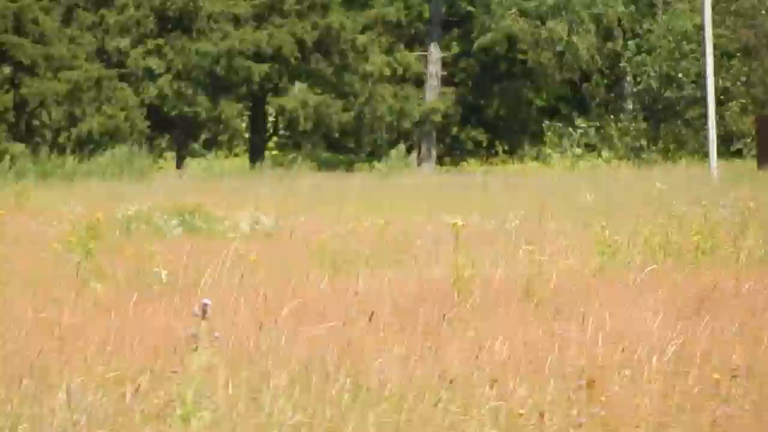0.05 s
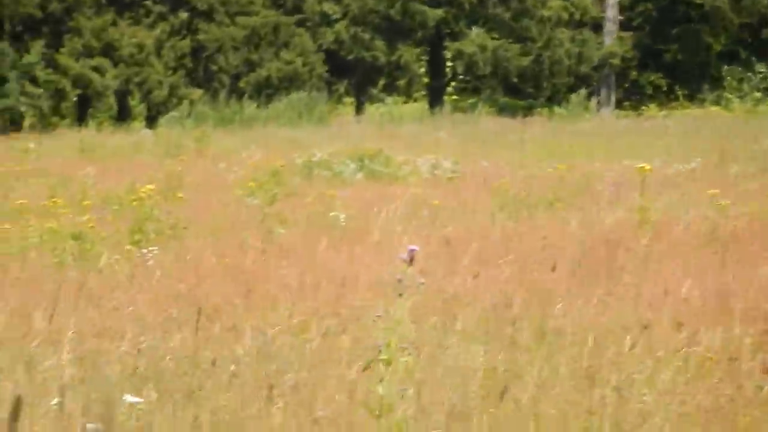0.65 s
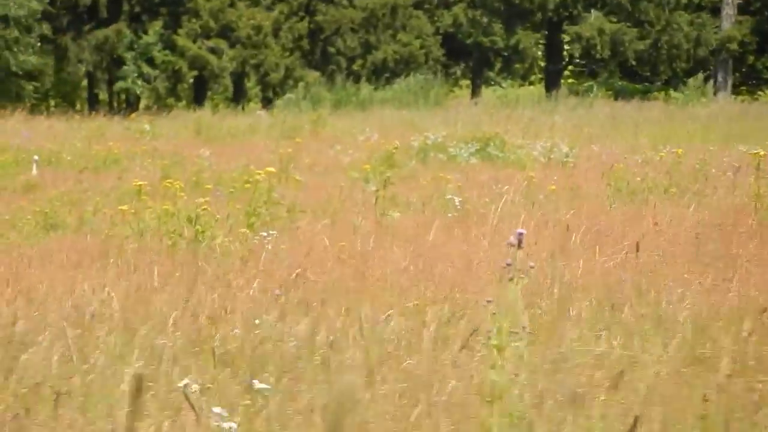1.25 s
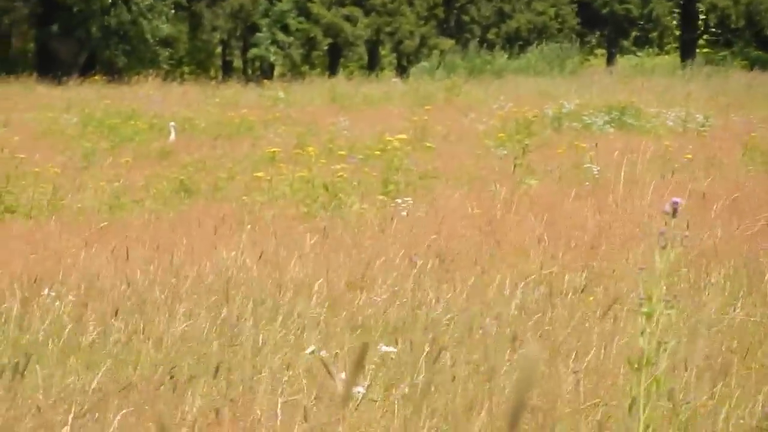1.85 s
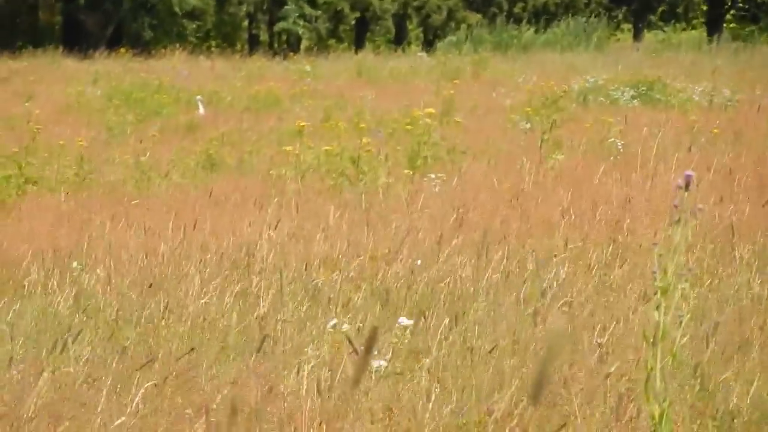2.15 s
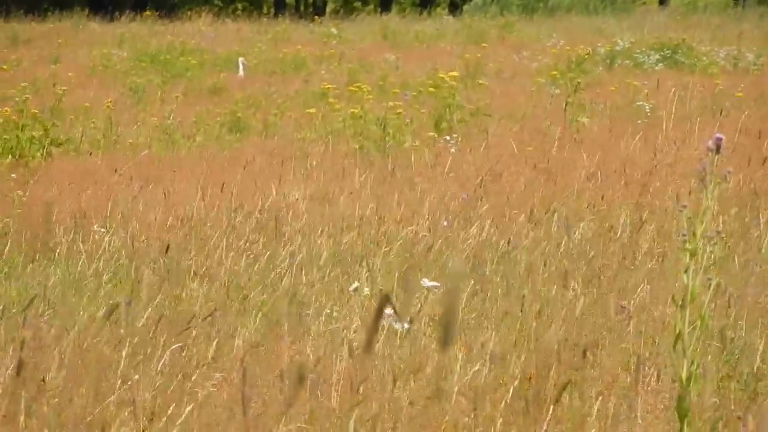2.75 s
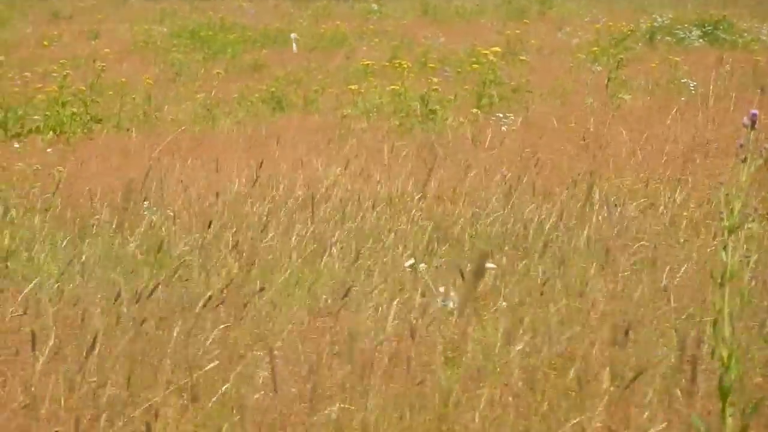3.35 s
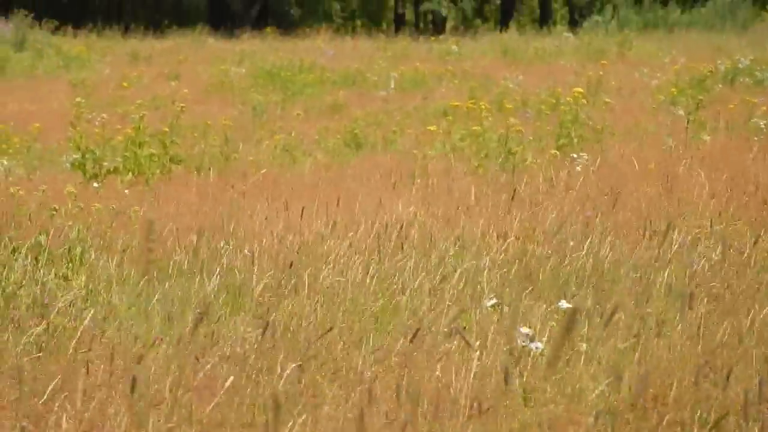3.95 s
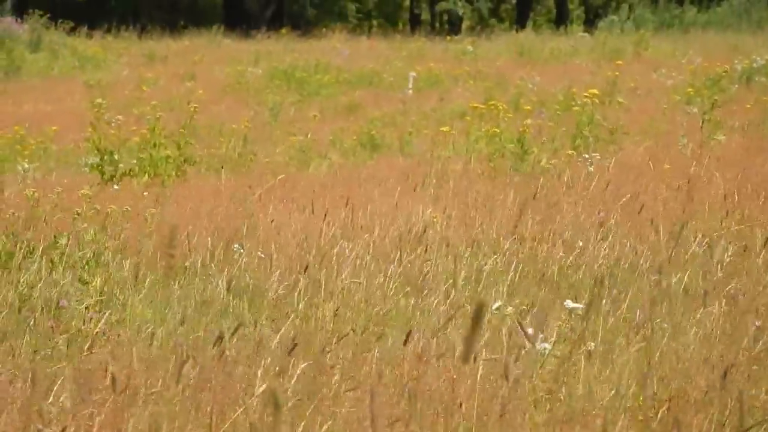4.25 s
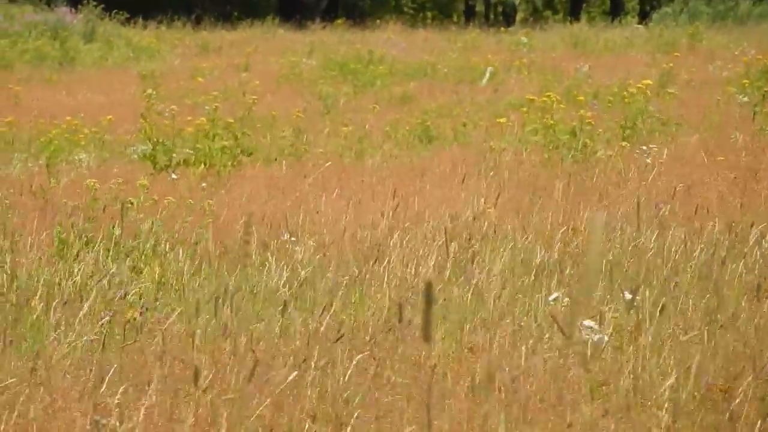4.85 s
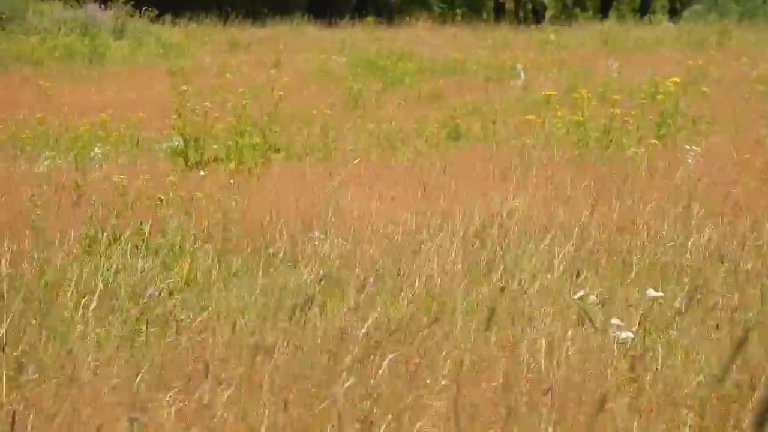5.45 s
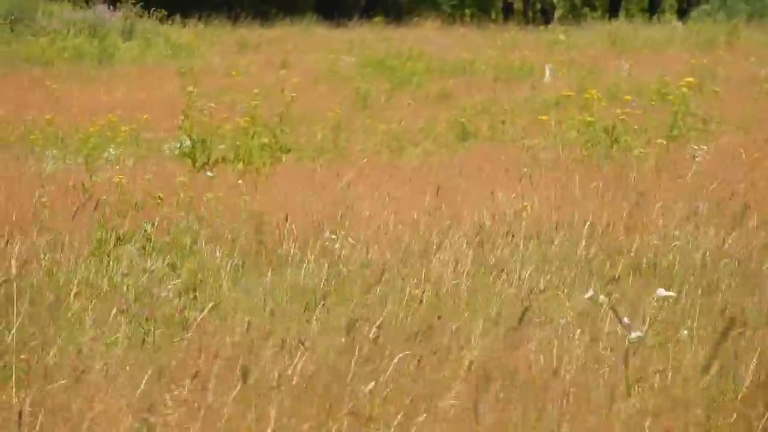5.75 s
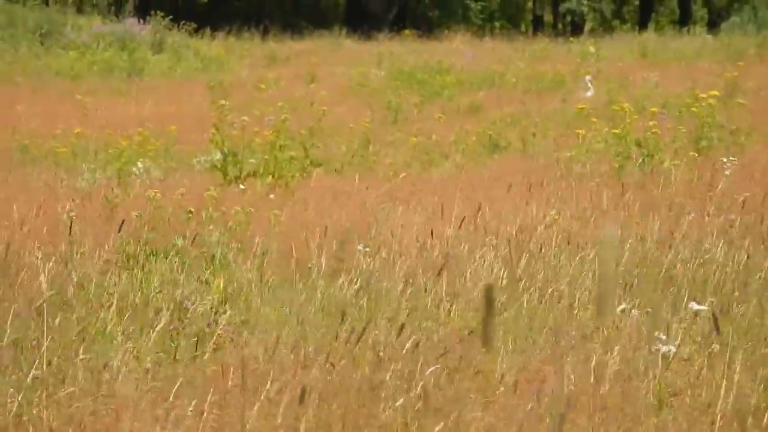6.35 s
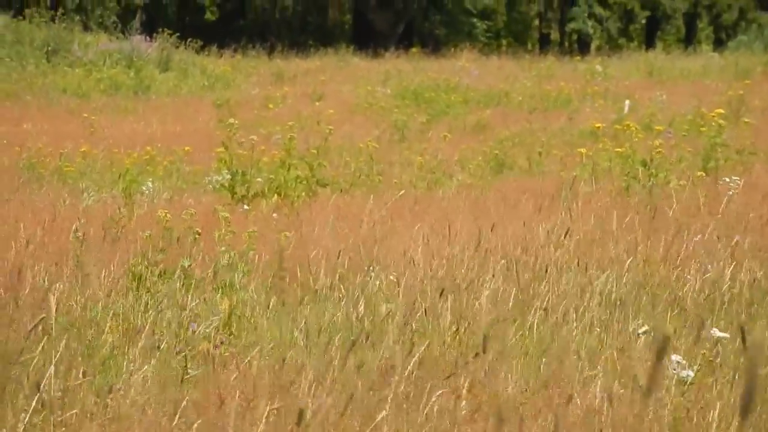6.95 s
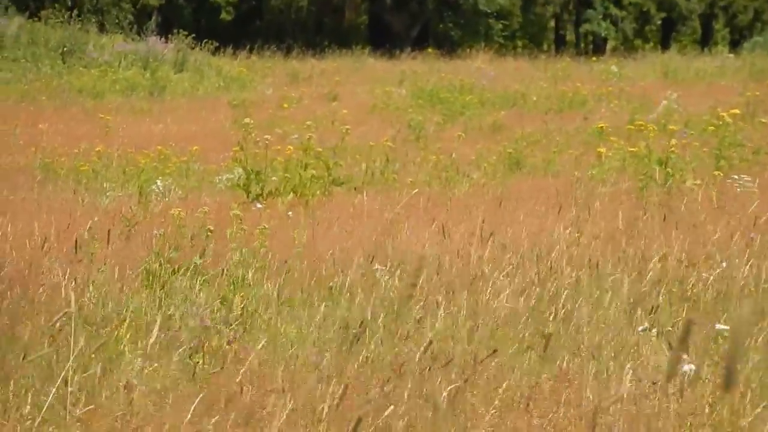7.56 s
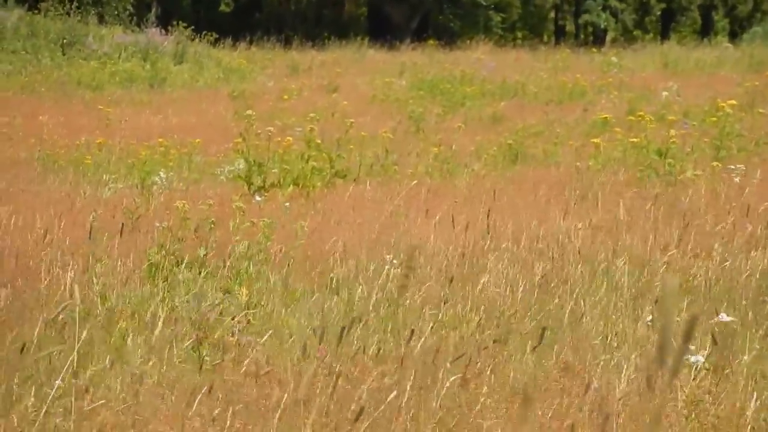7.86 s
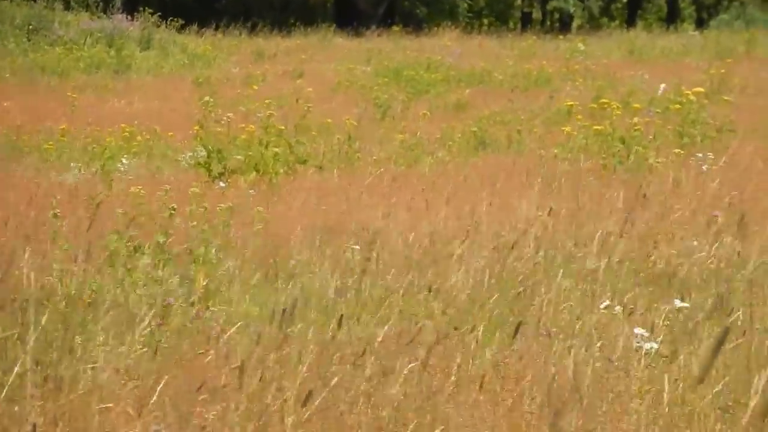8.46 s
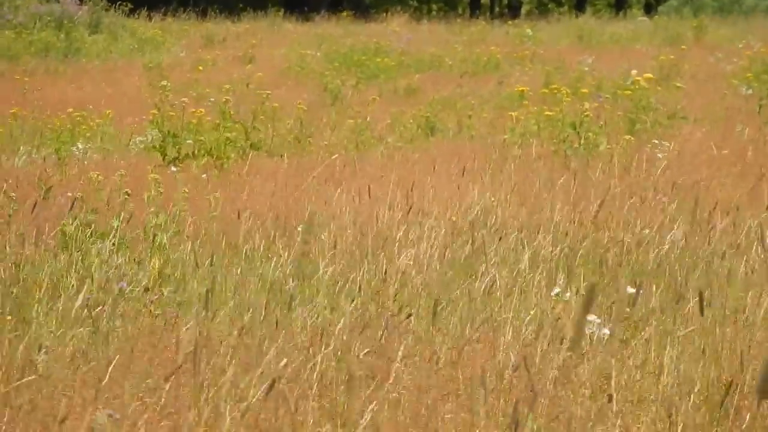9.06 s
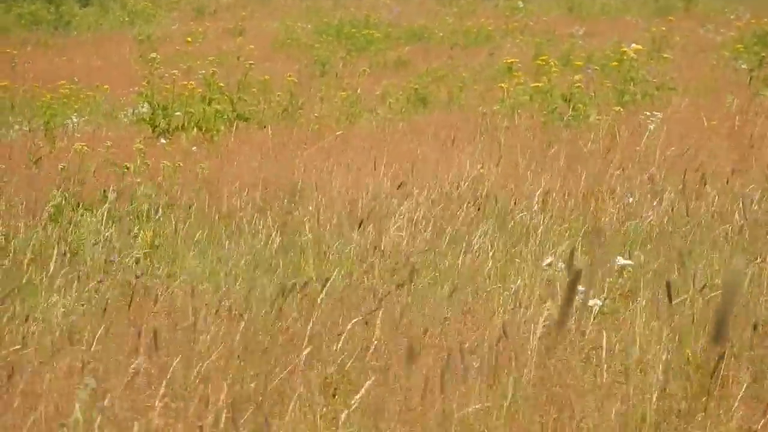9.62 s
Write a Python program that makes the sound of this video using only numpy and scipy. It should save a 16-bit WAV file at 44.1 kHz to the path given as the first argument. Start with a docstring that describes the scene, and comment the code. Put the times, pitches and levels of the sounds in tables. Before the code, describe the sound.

Gusty wind buffets the microphone in a meadow, over steady, high, pulsing insect chirring and a faint, repeated bird chirp.

```python
"""A summer meadow, heard from a hand-held camera. From the start a near bush-cricket scrapes its wings
in about ten short rasps (syllables) a second, while another buzzes over the hiss of far insects.
Soon a bird joins in with a thin falling whistle about once a second, and a third cricket answers
now and then. Gusts build up and hit the two microphone openings (ports); around three to four seconds
in, the hardest blows make a limiter turn everything down briefly. The wind eases; the insects go on."""
import sys
import numpy as np
from scipy import signal
from scipy.fft import rfft, irfft, next_fast_len
from scipy.io import wavfile
from scipy.ndimage import uniform_filter1d, minimum_filter1d, map_coordinates

SR = 44100
rng = np.random.default_rng(int(sys.argv[2]) if len(sys.argv) > 2 else 0)


def dump(signal):
    """Clip the signal to [-1, 1] and save it as 16-bit WAV at the path in sys.argv[1]."""
    limited = np.clip(np.atleast_2d(signal).T, -1, 1)
    pcm = np.round(limited * 32767).astype(np.int16)
    wavfile.write(sys.argv[1], SR, pcm)


N = 427329
TIME = np.arange(N) / SR

# Levels in the tables are relative: the functions add their own gains.
# tone of the far insects: f/Hz, level/dB
CHORUS_SPECTRUM = [(3000, -13), (6800, -17), (8000, -10.5), (9500, -4), (11500, 0.5), (12500, -3.5),
                   (14200, 0.5), (15800, -6.5)]
# tone of the soft background hush: f/Hz, level/dB
HUSH_SPECTRUM = [(21, 24.5), (61, 20), (112, 1), (205, 6.5), (355, 1.5), (610, 7.5), (1020, 2), (1950, -4),
                 (3100, -12), (4600, -5), (6900, -7), (15900, -31)]
# when the bird calls: t/s, level/dB
BIRD_CALLS = [(.599, -50.5), (1.541, -51.5), (2.476, -52.5), (3.595, -47.5), (4.459, -50.5), (5.295, -52),
              (6.276, -41), (7.124, -52.5), (8.01, -51), (8.828, -55)]
# the slide of one call: t/s within the call, f/Hz, level/dB
CALL_SHAPE = [(-.004, 6010, -21), (.005, 5860, -3), (.017, 5620, 4), (.030, 5246, 2.5), (.041, 5250, 4.5),
              (.049, 5100, -15), (.056, 5000, -26)]
# faint, short, high ticks: t/s, level/dB
TICK_TIMES = [(3.378, -41), (4.098, -42), (4.167, -38), (4.978, -42)]
# light breeze between gusts: t/s, level/dB
BREEZE_LEVEL = [(0, -47), (5, -27.5), (9.7, -54.5)]
# gusts over the ports: t/s, length/s, left level/dB, right level/dB, extra turbulence/dB
WIND_GUSTS = [(0.086, 0.17, -54, -40.5, -5), (0.44, 0.22, -50, -32.5, -10), (0.63, 0.026, -47, -22.5, -6),
              (0.797, 0.27, -42, -36, -17), (1.105, .14, -25, -20, 0), (1.293, 0.085, -37, -18.5, -1.5),
              (1.407, 0.22, -36, -20, -6), (1.69, 0.039, -52, -30, 13), (1.877, 0.19, -24, -16, -13),
              (2.065, 0.2, -17.5, -13.5, -2.5), (2.335, 0.16, -21, -14, 0.5),
              (2.56, 0.073, -26, -25.5, -10), (2.695, .11, -11, -11.5, -2), (2.845, .14, -19, -18.5, 0.5),
              (3.042, 0.23, -16, -14, 6), (3.318, 0.12, -15, -15, 1.5), (3.48, 0.11, -14.5, -11.5, -0.5),
              (3.656, 0.043, -19.5, -15.5, -6), (3.785, 0.22, -22, -19.5, 3.5),
              (4.032, 0.13, -14, -10, 1.5), (4.165, 0.14, -12, -10.5, 2), (4.303, .32, -15, -12, -4.5),
              (4.67, 0.075, -14, -12.5, -10.5), (4.798, 0.26, -28, -15, -7), (5.066, 0.21, -21, -19.5, -11),
              (5.44, 0.19, -27.5, -17.5, 1), (5.608, .24, -17.5, -17, 1), (5.89, 0.13, -46, -27.5, -21),
              (6.062, .23, -17.5, -16, -1), (6.35, 0.35, -25, -19.5, -3.5), (6.632, 0.23, -17, -12.5, -0.5),
              (6.857, .20, -18, -18, -4.5), (7.144, .13, -26, -25, -19), (7.556, 0.19, -30.5, -23.5, -2.5),
              (7.848, 0.33, -24, -21, -15), (8.185, 0.25, -36.5, -32, -8), (8.772, 0.28, -44.5, -47, -11),
              (8.905, 0.015, -36, -25, -7), (9.542, 0.14, -35, -24.5, 1)]
# tone of slow eddies (swirls of air): f/Hz, level/dB
RUMBLE_SPECTRUM = [(15, -40), (30, -19), (45, -9), (62, -1), (85, -0.5), (115, -4.5), (160, -16.5),
                   (250, -28.5), (400, -68), (800, -68), (2000, -77)]
# tone of the finer turbulence in strong gusts: f/Hz, level/dB
FLUTTER_SPECTRUM = [(50, -20), (120, 5.5), (220, 2), (320, -4.5), (450, -16.5), (700, -34), (1200, -44.5),
                    (3000, -51), (8000, -98)]
# hard eddies that hit one port: t/s, peak/dB, treble cutoff/Hz, crackle decay/s, port (0 left, 1 right)
HARD_EDDIES = [(1.152, -1.5, 3030, 0.0041, 1), (1.200, -2, 647, 0.0092, 1), (2.121, -11.5, 900, .008, 1),
               (2.159, -9.5, 910, 0.0083, 0), (2.287, -11, 2200, 0.0057, 1), (2.714, -9, 1000, 0.0072, 0),
               (2.753, -3, 3000, 0.0065, 1), (3.085, -7, 1400, 0.0036, 1), (3.100, -7, 1600, .004, 1),
               (3.144, -1.5, 640, 0.005, 1), (3.201, -2, 3000, 0.0022, 1), (3.214, -2.5, 2300, 0.0036, 1),
               (3.268, -2, 1100, 0.0051, 1), (3.365, -10.5, 900, 0.0052, 1), (3.402, 6.5, 3500, 0.004, 1),
               (3.500, -3.5, 603, 0.0046, 1), (3.580, 0, 700, 0.011, 1), (3.792, -3, 560, 0.0093, 1),
               (3.926, -6.5, 530, 0.0028, 0), (4.121, 4.5, 3340, 0.0045, 1), (4.189, 9, 1670, 0.0075, 1),
               (4.235, 3, 614, 0.028, 1), (4.712, -11.5, 2200, .005, 1), (5.001, -1.5, 476, .003, 1),
               (5.013, 3.5, 2580, 0.0033, 1), (5.535, -12, 1310, 0.0054, 1), (5.735, -6, 714, 0.0037, 0),
               (5.856, -9, 676, .008, 1), (6.379, -7, 676, 0.009, 1), (6.665, -7.5, 1100, 0.0062, 0),
               (6.700, -14.5, 2000, 0.012, 1), (6.770, -8.5, 865, .008, 1), (6.830, -7.5, 1300, 0.0049, 1),
               (7.232, -10.5, 2282, 0.004, 1), (7.280, -9, 484, .004, 1)]
# tone of a cricket's wing scrape: f/Hz, level/dB
SCRAPE_SPECTRUM = [(4000, -32), (7200, -26), (8500, -19.5), (9500, -7.5), (10300, -12.5), (11400, -2),
                   (12000, 4), (12600, -5), (13200, -9), (14300, -4), (15800, -15)]
# a syllable, as the wings open once and close in two pulls: offset/s, length/s, level/dB, tooth rate/Hz
WING_STROKES = [(-.0272, .0044, -12, 1200), (-.0091, .0031, -7.5, 900), (-.0019, .0046, -4.5, 880)]
# single syllables from a neighbouring cricket: t/s, level/dB
NEIGHBOUR_SYLLABLES = [(1.670, -33), (6.634, -34), (9.002, -32)]
# the near cricket's runs of even tempo: t/s, syllable rate/Hz
SONG_RUNS = [(.0518, 10.68), (.239, 10.40), (.9118, 10.09), (1.4226, 10.35), (2.7754, 10.57), (3.4378, 9.4),
             (3.757, 10.0), (4.5566, 10.18), (5.3425, 10.41), (6.6871, 10.22), (6.9806, 10.59),
             (7.925, 10.28), (8.7032, 10.47)]
# how hard the near cricket sings: t/s, level/dB
SONG_EFFORT = [(0, -26), (.35, -26), (1.1, -27.5), (1.85, -34), (2.2, -28.5), (2.35, -32), (2.85, -30.5),
               (3.2, -27), (3.6, -30.5), (4.0, -27), (4.9, -28.5), (5.85, -30.5), (6.35, -30.5),
               (6.65, -28), (7.35, -30), (8.6, -28.5), (9.7, -31)]
# where the near cricket is heard as the camera turns: t/s, left minus right level/dB
SONG_PAN = [(0, 4), (1.5, 8.5), (3, 6.5), (5, 5.5), (7, 6), (8.2, 6.5), (9.7, 5)]


def gain_of(db):
    """Turns decibels into a number to multiply a sound by."""
    return 10 ** (np.asarray(db) / 20)


def unit_rms(x):
    """Scales each channel to an average strength (rms) of 1."""
    return x / np.sqrt(np.mean(x ** 2, axis=-1, keepdims=True) + 1e-20)


def curve(rows, column, t=TIME):
    """One column of a table, joined by straight lines in time."""
    rows = np.asarray(rows, float)
    return np.interp(t, rows[:, 0], rows[:, column])


def noise(spectrum, shape=(2, N)):
    """Noise of rms 1 with the tone of a spectrum table, separate for each channel."""
    size = next_fast_len(N + 4096)
    hz, db = np.transpose(spectrum)
    tone_db = np.interp(np.log(np.fft.rfftfreq(size, 1 / SR) + 1), np.log(hz), db)
    white = rfft(rng.standard_normal(shape), size)
    return unit_rms(irfft(white * gain_of(tone_db), size)[..., :N])


def wander(per_s):
    """A smooth curve of rms 1 through per_s random points a second."""
    points = rng.standard_normal(8192)
    smooth = map_coordinates(points, [TIME[::32] * per_s], mode="wrap")
    return unit_rms(np.interp(TIME, TIME[::32], smooth))


def add(mix, s, sound):
    """Mixes a sound in at s seconds."""
    part = mix[max(round(s * SR), 0):][:len(sound)]
    part += sound[:len(part)]


def place(x, pan_db, lag_s=.000027):
    """Makes stereo: the left is pan_db louder, and the right comes a little later."""
    size = next_fast_len(N + 64)
    delay = np.exp(-2j * np.pi * np.fft.rfftfreq(size, 1 / SR) * lag_s)
    late = irfft(rfft(x, size) * delay, size)[:N]
    return np.array([x * gain_of(pan_db / 2), late * gain_of(-pan_db / 2)])


def echo(x, fade_s):
    """Many tiny reflections blur into a tail that drops 60 dB in fade_s."""
    t = TIME[:SR // 2]
    tail = unit_rms(rng.standard_normal((2, len(t))) * gain_of(-60 * t / fade_s)) / np.sqrt(len(t))
    return signal.oaconvolve(x, tail, axes=1)[:, :N]


def meadow(chorus_db=-48.5, hush_db=-53.5, flicker_db=2.0):
    """Countless far insects merge into hiss over a soft hush whose pitch bands flicker at random."""
    chorus = noise(CHORUS_SPECTRUM) * gain_of(chorus_db + 1.7 * wander(13))
    bands = signal.stft(noise(HUSH_SPECTRUM), nperseg=1024)[2]
    flicker = rng.standard_normal(bands.shape[1:])
    flicker = uniform_filter1d(uniform_filter1d(flicker, size=4, axis=0), size=7, axis=1)
    hush = signal.istft(bands * gain_of(flicker_db * flicker / flicker.std()))[1][:, :N]
    return chorus + unit_rms(hush) * gain_of(hush_db + 1.1 * wander(1.83))


def buzzing_cricket(level_db=-52.0, beat_hz=103.5, ring_hz=13200, fall_hz=5000, width_hz=3000):
    """A farther cricket beats its wings about 100 times a second; their ring falls in each stroke."""
    phase = np.cumsum(beat_hz * (1 + 0.0031 * wander(3.9))) / SR % 1 - .5
    strokes = rng.standard_normal(N) * np.exp(-(phase / .14) ** 2 / 2)
    # keep only a band of the noise, centred on the falling pitch
    sweep = np.exp(2j * np.pi * np.cumsum(ring_hz - fall_hz * phase) / SR)
    ring = (sweep * signal.lfilter(*signal.butter(2, width_hz / 2, fs=SR), strokes / sweep)).real
    return place(gain_of(level_db + 0.51 * wander(23)) * unit_rms(ring), pan_db=6.5)


def bird(gain_db=-8, echo_db=-9, flicker_db=2.0):
    """A nearly pure falling whistle, each at its own pace, echoed faintly by the forest edge."""
    out = np.zeros(N)
    bend, flicker = 1 + .008 * wander(110), flicker_db * wander(130)
    paces = np.exp(.07 * np.clip(rng.standard_normal(len(BIRD_CALLS)), -1.5, 1.5))
    for (s, db), pace in zip(BIRD_CALLS, paces):
        t = np.arange(CALL_SHAPE[0][0] / pace, CALL_SHAPE[-1][0] / pace, 1 / SR)
        hz = curve(CALL_SHAPE, 1, t * pace) * np.interp(s + t, TIME, bend)
        loudness = gain_of(db + curve(CALL_SHAPE, 2, t * pace) + np.interp(s + t, TIME, flicker))
        add(out, s + t[0], loudness * np.sin(2 * np.pi * np.cumsum(hz) / SR))
    direct = place(out, pan_db=13)
    return gain_of(gain_db) * (direct + gain_of(echo_db) * echo(direct, fade_s=0.15))


def ticks(band_hz=(3800, 6200), decay_s=0.0038):
    """Faint, short, high ticks during the strongest gusts."""
    out, t = np.zeros(N), TIME[:1024]
    for s, db in TICK_TIMES:
        add(out, s, gain_of(db) * np.exp(-t / decay_s) * rng.standard_normal(len(t)))
    band = signal.butter(2, band_hz, "band", fs=SR, output="sos")
    return place(signal.sosfilt(band, out), pan_db=-3)


def wind_strength(rise_s=0.02, decay_s=0.044):
    """Gusts rise, hold and fade over the breeze; gives pressure and extra turbulence per port in dB."""
    t = TIME[::64]
    power = gain_of(curve(BREEZE_LEVEL, 1, t)) ** 2 * np.ones((2, 1))
    churn = np.zeros_like(power)
    for start, length, left_db, right_db, turbulence_db in WIND_GUSTS:
        age = np.maximum(t - start, 0)
        shape = np.minimum(age / rise_s, 1) * np.exp(-np.maximum(age - length, 0) / decay_s)
        gust = (shape * gain_of([[left_db], [right_db]])) ** 2
        power += gust
        churn += turbulence_db * gust
    return [np.array([np.interp(TIME, t, port) for port in both_ports])
            for both_ports in (10 * np.log10(power), churn / power)]


def wind(pressure_db, turbulence_db, rumble_db=-1, flutter_db=-13, strong_db=-20, swirl_db=3.5):
    """Eddies rumble over each port; finer turbulence flutters in lumps and grows faster with the wind."""
    pressure_db = pressure_db + swirl_db * np.clip([wander(22), wander(22)], -2, .7)
    eddies = noise(RUMBLE_SPECTRUM)
    eddy_power = abs(uniform_filter1d(eddies ** 2, size=2400))
    steadied = unit_rms(eddies / eddy_power ** 0.39)  # irons out most chance swells
    rumble = steadied * gain_of(pressure_db + rumble_db)
    lumps = gain_of(8 * np.clip([wander(45), wander(45)], -2, 1.4))
    grown_db = strong_db + 1.55 * (pressure_db - strong_db)
    flutter = unit_rms(noise(FLUTTER_SPECTRUM) * lumps) * gain_of(flutter_db + turbulence_db + grown_db)
    return rumble + flutter


def small_eddies(pressure_db, count=170, above_db=4, spread_db=3, cutoff_hz=440, crackle_s=0.0065):
    """Light eddies at random moments follow the wind's strength; gives rows like HARD_EDDIES."""
    at, port = rng.integers(0, [N, 2], (count, 2)).T
    size, sharpness = np.clip(rng.standard_normal((2, count)), -1.5, 1.5)
    peak_db = pressure_db[port, at] + above_db + spread_db * size
    cutoffs = cutoff_hz * np.exp(0.07 * sharpness)
    return np.transpose([at / SR, peak_db, cutoffs, np.full(count, crackle_s), port])


def wind_thumps(eddies, leak=0.13, crackle_hz=400):
    """An eddy's core crosses a port: a sharp suck between two soft pushes, wrapped in crackle."""
    out = np.zeros((2, N))
    t = np.arange(-4096, 4096) / SR
    hz = np.fft.rfftfreq(len(t), 1 / SR)
    crackle_tone = hz / (crackle_hz ** 2 + hz ** 2) ** 1.48
    for s, db, cutoff_hz, crackle_s, port in eddies:
        width_s = 0.0012 * (1500 / cutoff_hz) ** 0.28  # fast eddies are both shorter and sharper
        core = ((t / (1.06 * width_s)) ** 2 - 1) * np.exp(-abs(t) / width_s)
        churn = unit_rms(irfft(rfft(rng.standard_normal(len(t))) * crackle_tone))
        crackle_db = -25 + 3 * np.log2(crackle_s / 0.0089)  # a lingering eddy breaks up more
        crackle = gain_of(crackle_db) * churn * np.exp(-abs(t) / crackle_s)
        thump = irfft(rfft(core + crackle) / np.sqrt(1 + (hz / cutoff_hz) ** 6))
        add(out[int(port)], s + t[0], gain_of(db) * thump / abs(thump).max())
    return out + leak * out[::-1]  # the other port hears a little too


def near_song(spread_db=0.66):
    """The near cricket repeats its syllable evenly through each run; gives rows of t/s, level/dB."""
    ends = [start for start, rate in SONG_RUNS[1:]] + [N / SR]
    times = np.concatenate([start + np.arange(round((end - start) * rate)) / rate
                            for (start, rate), end in zip(SONG_RUNS, ends)])
    levels_db = curve(SONG_EFFORT, 1, times) + spread_db * rng.standard_normal(len(times))
    return np.transpose([times, levels_db])


def wing_teeth(syllables, ring_hz=11600, spread_hz=380, fall_hz=1400, ring_s=0.00032, spread_db=2.84):
    """A row of teeth on one wing drags over the other's edge: each tooth gives a short falling ring."""
    out = np.zeros(N)
    t = np.arange(-64, 64) / SR
    swell = np.exp(-(t / ring_s) ** 2 / 2)
    for s, db in syllables:
        for offset, length, stroke_db, rate in WING_STROKES:
            force = gain_of(db + stroke_db + spread_db * rng.standard_normal())
            teeth = rng.standard_normal((8, 4))[:max(round(length * rate), 1)]
            for k, (late, _, detune, phase) in enumerate(teeth):
                cycles = (ring_hz + spread_hz * detune) * t - fall_hz * t ** 2 / (4 * ring_s) + phase
                slip_at = s + offset + (k + .5 + 0.14 * late) / rate
                add(out, slip_at + t[0], force * swell * np.cos(2 * np.pi * cycles))
    return out


def rasping_cricket(syllables, pan_db, gain_db, contact_db=-3.5, rub_db=-9, rub_s=0.03, grass_db=-10):
    """Each tooth rings and scrapes, the wings rub softly, and grass stalks add a short echo."""
    teeth = wing_teeth(syllables)
    contact = np.sqrt(abs(uniform_filter1d(teeth ** 2, size=40)))  # follows each tooth's loudness
    rub = np.sqrt(abs(uniform_filter1d(teeth ** 2, size=round(rub_s * SR))))
    scrape = np.hypot(gain_of(contact_db) * contact, gain_of(rub_db) * rub) * noise(SCRAPE_SPECTRUM, N)
    direct = place(teeth + scrape, pan_db)
    return gain_of(gain_db) * (direct + gain_of(grass_db) * echo(direct, fade_s=.014))


def scene():
    """Insects, bird, wind and ticks add up at the two ports."""
    near = rasping_cricket(near_song(), pan_db=curve(SONG_PAN, 1), gain_db=2.8)
    neighbour = rasping_cricket(NEIGHBOUR_SYLLABLES, pan_db=-1, gain_db=6.5)
    pressure_db, turbulence_db = wind_strength()
    gusts = wind(pressure_db, turbulence_db)
    thumps = wind_thumps(HARD_EDDIES) + wind_thumps(small_eddies(pressure_db))
    return near + neighbour + buzzing_cricket() + meadow() + bird() + gusts + thumps + ticks()


def record(dry, bass_hz=38, limit_db=-5, slope=0.86, recover_db_per_s=16, top_hz=15900):
    """Cuts deep bass, turns both sides down at loud peaks and slowly back up, then cuts high treble."""
    dry = signal.lfilter(*signal.butter(2, bass_hz, "high", fs=SR), dry)
    peak_db = 20 * np.log10(abs(dry).max(0) + 1e-9)
    needed_db = slope * np.maximum(peak_db - limit_db, 0)
    recovery_db = TIME * recover_db_per_s
    cut_db = np.maximum.accumulate(needed_db + recovery_db) - recovery_db
    cut_db = uniform_filter1d(-minimum_filter1d(-cut_db, size=160), size=120)  # hold, then smooth
    low_pass = signal.firwin(511, top_hz, window=("kaiser", 9), fs=SR)
    return signal.oaconvolve(dry * gain_of(-cut_db), low_pass[None], "same")


dry = scene()
out = record(dry)
dump(out)
```